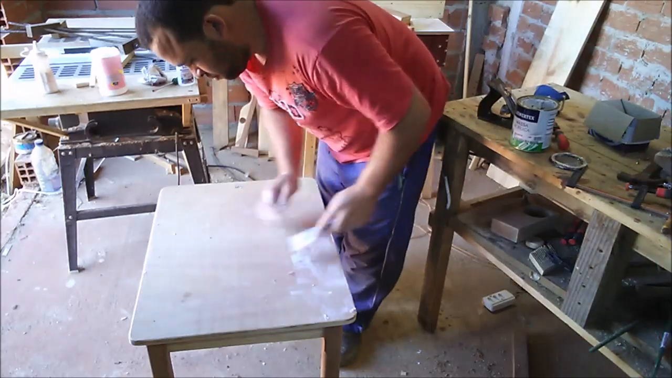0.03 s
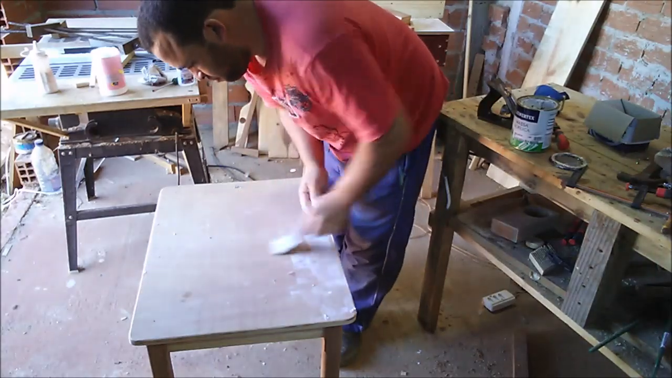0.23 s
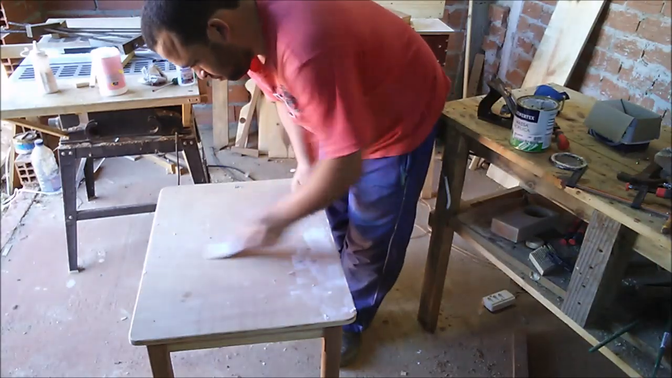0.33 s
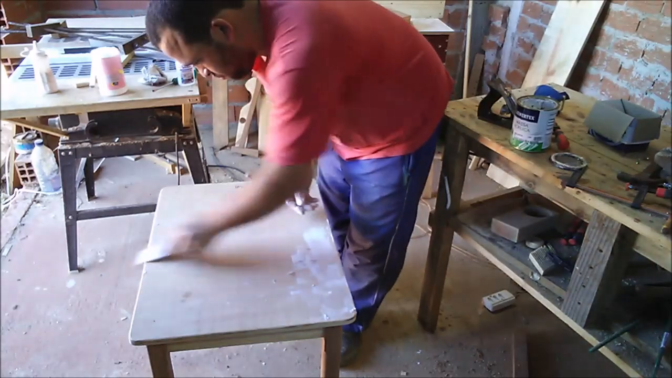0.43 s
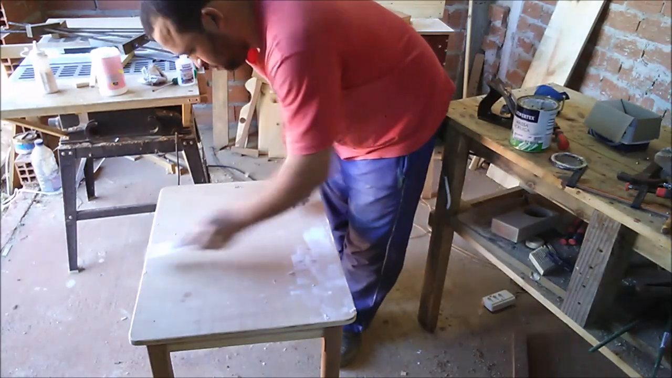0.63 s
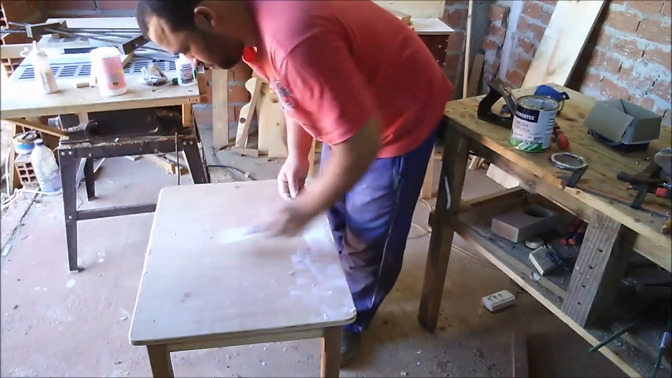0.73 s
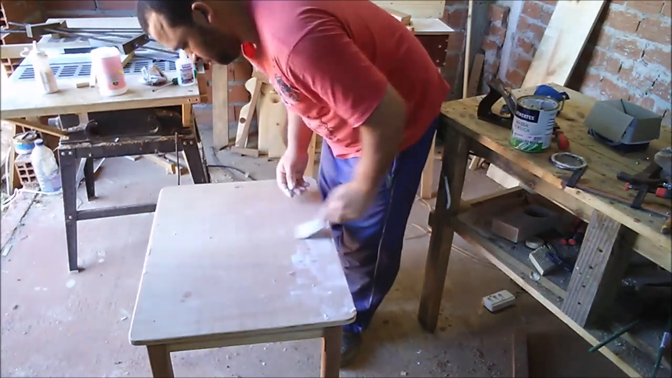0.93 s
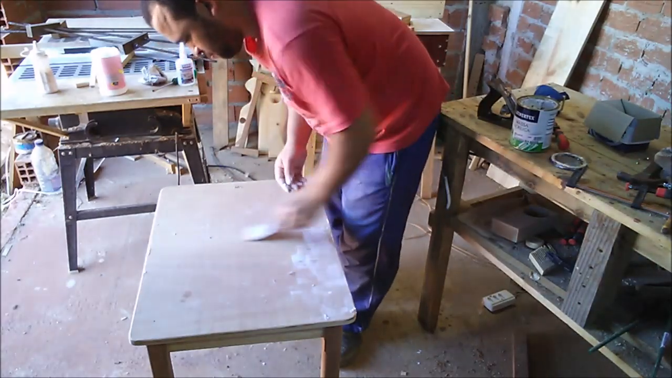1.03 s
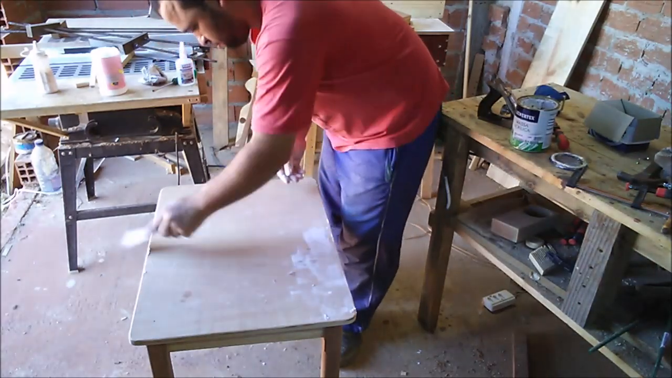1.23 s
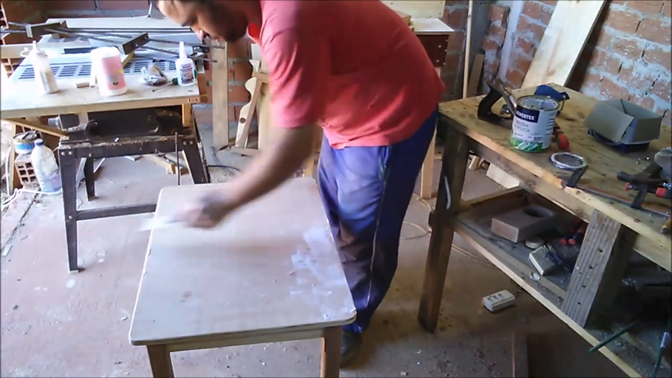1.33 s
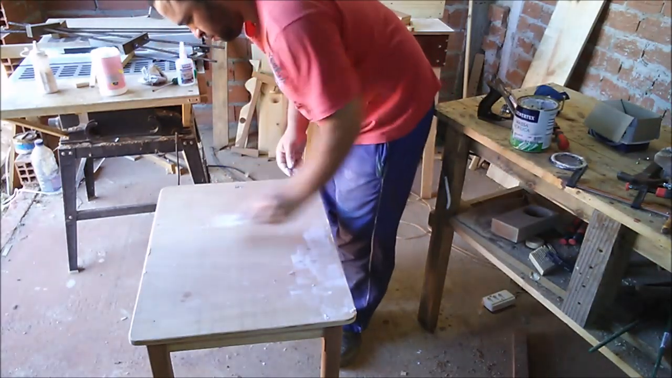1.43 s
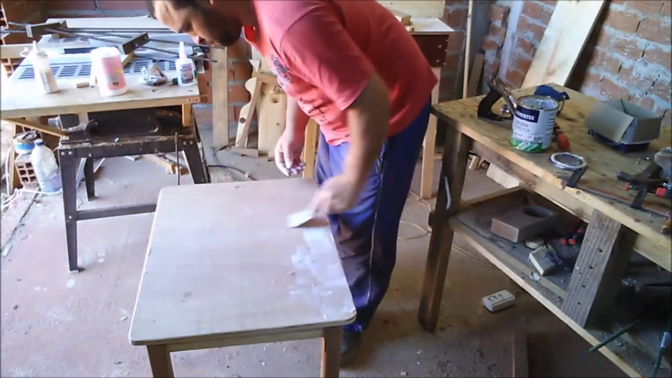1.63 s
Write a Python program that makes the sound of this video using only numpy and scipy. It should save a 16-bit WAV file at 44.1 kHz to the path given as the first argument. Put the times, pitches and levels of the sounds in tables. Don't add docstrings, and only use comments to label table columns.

```python
import sys
import numpy as np
from scipy import signal
from scipy.fft import rfft, irfft, next_fast_len
from scipy.io import wavfile
from scipy.ndimage import uniform_filter1d, map_coordinates

SR = 44100
rng = np.random.default_rng(int(sys.argv[2]) if len(sys.argv) > 2 else 0)


def unload_wav(signal):
    wavfile.write(
        sys.argv[1],
        SR,
        np.round(np.clip(np.atleast_2d(signal).T, -1, 1) * 32767).astype(np.int16),
    )


def ratio_of_db(decibels):
    return 10 ** (np.asarray(decibels, float) / 20)


N = 74970
LEAD_S = .5
M = N + round(LEAD_S * SR)

# pitch_hz, density_db_per_hz
AIR_COLOUR = [(100, -16.5), (380, -2.5), (680, -4.5), (850, -21.5), (3200, -25.5), (4500, -17.5),
              (8000, -34), (15500, -69)]
AIR_DB = -65

# start_s, length_s, first_hz, last_hz, level_db
FAR_TONES = [(-.02, 0.074, 555, 560, -53.5), (0.055, 0.086, 597, 545, -55.5),
             (.158, 0.027, 4130, 4260, -63), (.182, .04, 4380, 4480, -65), (.68, 0.11, 1060, 1060, -60.5),
             (0.804, 0.096, 6090, 6060, -73.5), (.888, .045, 4010, 4010, -70), (.9, .1, 535, 540, -52),
             (.935, 0.035, 1140, 1130, -54.5), (1.45, 0.16, 820, 745, -62.5),
             (1.494, 0.098, 4300, 4200, -65.5), (1.8, 0.113, 3800, 4700, -62),
             (1.58, 0.059, 6500, 6500, -78.5), (.54, 0.063, 780, 700, -54), (1.676, 0.046, 486, 450, -54.5),
             (1.672, 0.03, 1120, 1170, -54.5), (1.678, 0.024, 2620, 2600, -58),
             (2.3, 0.0353, 2050, 2000, -59.5), (1.676, .03, 3200, 2700, -64), (.85, .04, 5700, 5090, -73.5),
             (.885, 0.045, 1080, 1080, -67), (.135, .025, 1900, 1700, -69)]
FAR_WIDTH_HZ, FLUTTER_DB = 14, 2.5

# pitch_hz, t60_s
ROOM_DECAY = [(200, 0.4), (800, 0.93), (3000, 0.82), (6000, 0.62), (9000, 0.49), (13000, 0.42)]
# pitch_hz, level_db
WALL_COLOUR = [(200, 4), (700, 2), (1500, 2.5), (2500, 0), (4000, 3), (5000, -2), (7000, 1), (14000, -5.5)]
ROOM_DB, NEAR_DB, NEAR_SHARE = -13, -3.5, 0.52

# time_s, level_db
STROKE_PRESSURE = [
    [(-.4, -43), (-.3, -21.5), (-.15, -32), (-.14, -45)],
    [(.219, -41), (.223, -39.5), (.236, -32), (.27, -29), (.31, -29.5), (.4, -28), (.472, -30),
     (.49, -28.5), (.52, -60)],
    [(.955, -75), (.975, -54), (.985, -42), (.995, -35.5), (1.04, -37.5), (1.12, -29), (1.23, -29.5),
     (1.28, -33), (1.31, -42)],
    [(1.68, -71), (1.69, -52.5), (1.696, -59), (1.7, -40.5)],
]
# start_s, speeding_up_s, full_speed_pitch_hz, ridge_clarity (0-1)
HAND_PUSHES = [
    (-.45, 0.26, 4700, 0.89),
    (.224, .1, 4850, 1),
    (1.01, .1, 4950, .6),
    (1.7, .09, 4800, 1),
]
# pitch_hz, density_db_per_hz
SLOW_PAPER = [(88, -45.5), (200, -15), (844, -7), (1450, -9.5), (2310, -10), (5440, -9.5), (12000, -41.5),
              (15500, -39)]
# pitch_hz, density_db_per_hz
FAST_PAPER = [(88, -64), (200, -33.5), (607, -23.5), (1480, -10.5), (3000, -7), (5300, -2.5), (12000, -27),
              (15500, -34.5)]
# pitch_hz, width_hz, level_db
TABLE_TOP = [(264, 60, 4), (476, 25, 4.5), (594, 41, 6.5), (843, 9.3, 10.5), (1004, 59, 6),
             (1121, 13.6, 8.5), (1452, 60, 3.5), (2246, 51, 3.5), (2650, 180, 1.5), (3425, 120, 3),
             (4430, 50, 2.5), (5600, 150, 1)]
REST_HZ, SECOND, SECOND_DB = 933, 0.556, 7.5
GRIT_WIDTH, GRIT_DB = .065, 11
BLUR = .33
GRAINS_PER_S, GRAIN_DB, CLUMP_DB = 16000, 1.6, 1.21

# start_s, thump_db, edge_ring_db
PAD_KNOCKS = [
    (0.228, -34, -31),
    (0.488, -49, -28.5),
    (.99, -38.5, -47),
    (1.272, -50, -30.5),
]
# pitch_hz, level_db, t60_s
THUMP_MODES = [(249.5, 0, 0.077), (323.6, -0.5, 0.078), (489, -4.5, 0.093)]
# pitch_hz, level_db, t60_s
EDGE_MODES = [(607.5, -7, 0.17), (648, -10, .2), (989, -2, 0.047), (2293, -1, 0.059), (2520, 7, 0.048)]

# start_s, length_s, level_db, pitch_hz, width_hz
PAD_RETURNS = [
    (.61, .17, -60.5, 4500, 2990),
    (1.374, 0.19, -62.5, 4150, 1390),
]

# start_s, end_s, level_db, growth_db
PAPER_GRAZES = [
    (0.935, .985, -52, 6.5),
]
# pitch_hz, width_hz, level_db
LOOSE_SHEET = [(1134, 270, 0), (2040, 87, -10), (2710, 240, -5), (3290, 210, -3.5), (3920, 200, -2.5),
               (4810, 500, -2), (6010, 300, -4), (7200, 140, -10), (9070, 240, -24), (10420, 250, -23),
               (12200, 230, -26), (13800, 300, -27)]

# pitch_hz, density_db_per_hz
GATE_COLOUR = [(600, -37.5), (900, -0.5), (2000, 0.5), (4000, -0.5), (7000, -13), (10000, -29.5),
               (15500, -41.5)]
GATE_DB, GATE_FLOOR_DB = -60, -15
GATE_FRAMES, GATE_BINS = 14, 3
LOW_CUT_HZ = 216
HISS_DB, RUMBLE_DB, RUMBLE_HZ = -88, -95, 90


def unit(x):
    return x / np.sqrt(np.mean(np.abs(x) ** 2) + 1e-20)


def along(points, hz):
    f, v = np.transpose(points)
    return np.interp(np.log(hz + 1), np.log(f + 1), v)


def wobble(rate):
    knots = rng.standard_normal(int(M * rate / SR) + 4)
    return map_coordinates(knots, [np.arange(M) * rate / SR])


def filtered(x, response):
    m = next_fast_len(len(x) + 8192)
    return irfft(rfft(x, m) * response(np.fft.rfftfreq(m, 1 / SR)), m)[:len(x)]


def band(f, centre_hz, width_hz):
    damping = 1j * f * width_hz
    return damping / (centre_hz ** 2 - f * f + damping)


def air():
    murmur = filtered(rng.standard_normal(M), lambda hz: ratio_of_db(along(AIR_COLOUR, hz)))
    return ratio_of_db(AIR_DB) * unit(murmur)


def far_tones():
    now, out = np.arange(M) / SR - LEAD_S, np.zeros(M)
    for start, length, first_hz, last_hz, db in FAR_TONES:
        part = np.clip((now - start) / length, 0, 1)
        pitch = first_hz + (last_hz - first_hz) * part + FAR_WIDTH_HZ * wobble(60)
        level = ratio_of_db(db + FLUTTER_DB * wobble(44.98))
        swell = np.abs(np.sin(np.pi * part)) ** .5
        out += level * swell * np.sin(2 * np.pi * np.cumsum(pitch) / SR)
    return out


def room(x):
    hz, t, z = signal.stft(rng.standard_normal((2, SR)), SR, nperseg=256)
    t60 = along(ROOM_DECAY, hz)[:, None] * np.array([1, NEAR_SHARE])[:, None, None]
    far, near = signal.istft(z * ratio_of_db(-60 * t / t60), SR, nperseg=256)[1]
    tail = ratio_of_db(ROOM_DB) * far / np.linalg.norm(far)
    tail = tail + ratio_of_db(NEAR_DB) * near / np.linalg.norm(near)
    return signal.fftconvolve(x, np.pad(tail, (130, 0)))[:M]


def speed(t):
    start, rise, top_hz, clear = np.transpose(HAND_PUSHES)
    k = np.clip(np.searchsorted(start, t + .08) - 1, 0, None)
    return np.tanh(np.clip(t - start[k], 0, None) / rise[k]), top_hz[k], clear[k]


def scratch():
    hit, size, sign = rng.random((3, M))
    grain = ratio_of_db(-GRAIN_DB * np.log(size + 0.014)) * np.sign(sign - .5)
    grit = (hit < GRAINS_PER_S / SR) * grain
    grit = grit * ratio_of_db(CLUMP_DB * (wobble(41.17) + wobble(160)))

    hz, t, z = signal.stft(grit, SR, nperseg=256, noverlap=192)
    share, top_hz, clear = speed(t - LEAD_S)
    pitch = REST_HZ + (top_hz - REST_HZ) * share

    def ridge(centre):
        return np.exp(-.5 * (np.log((hz[:, None] + 1) / centre) / GRIT_WIDTH) ** 2)

    slow, fast = along(SLOW_PAPER, hz)[:, None], along(FAST_PAPER, hz)[:, None]
    broad = ratio_of_db(slow * (1 - share) + fast * share)
    ridges_db = GRIT_DB * ridge(pitch) + SECOND_DB * ridge(SECOND * pitch)
    beamed = broad * ratio_of_db(clear * (1 - BLUR * share ** 4) * ridges_db)
    colours = np.array([beamed, broad]) / np.sqrt(np.mean(beamed ** 2, axis=0))
    rubs = signal.istft(z * colours, SR, nperseg=256, noverlap=192)[1][:, :M] / np.std(grit)

    now = np.arange(M) / SR - LEAD_S
    press = sum(ratio_of_db(np.interp(now, *np.transpose(rows), left=-200, right=-200))
                for rows in STROKE_PRESSURE)

    def wood(f):
        return 1 + sum((ratio_of_db(db) - 1) * band(f, c, w) for c, w, db in TABLE_TOP)

    return [filtered(rub * press, wood) for rub in rubs]


def knocks():
    out, t = np.zeros(M + SR), np.arange(SR // 2) / SR

    def ring(modes):
        return sum(ratio_of_db(db + rng.normal(0, 0.67) - 60 * t / t60) * np.sin(2 * np.pi * hz * t)
                   for hz, db, t60 in modes)

    for start, thump_db, edge_db in PAD_KNOCKS:
        blow = ratio_of_db(thump_db) * ring(THUMP_MODES) + ratio_of_db(edge_db) * ring(EDGE_MODES)
        blow = blow * (1 - np.exp(-t / 0.0036))
        out[round((start + LEAD_S) * SR):][:len(t)] += blow
    return out[:M]


def swish():
    now, out = np.arange(M) / SR - LEAD_S, np.zeros(M)
    for start, length, db, hz, width_hz in PAD_RETURNS:
        breeze = unit(filtered(rng.standard_normal(M), lambda f: band(f, hz, width_hz) ** 3))
        swell = np.abs(np.sin(np.pi * np.clip((now - start) / length, 0, 1)))
        out += ratio_of_db(db) * swell * breeze
    return out


def grazes():
    now, level = np.arange(M) / SR - LEAD_S, np.zeros(M)

    def paper(f):
        return sum(ratio_of_db(db) * np.abs(band(f, c, w)) ** 1.5 for c, w, db in LOOSE_SHEET)

    sheet = unit(filtered(rng.standard_normal(M), paper))
    for start, end, db, growth_db in PAPER_GRAZES:
        growth = ratio_of_db(db + growth_db * (now - start) / (end - start))
        level += growth * np.clip((now - start) / .003, 0, 1) * (now < end + .01)
    return sheet * level


def scene():
    near, broad = scratch()
    blows = knocks()
    walls = room(filtered(broad + .5 * blows, lambda hz: ratio_of_db(along(WALL_COLOUR, hz))))
    mono = near + blows + grazes() + swish() + walls + air() + far_tones()
    mono = mono[M - N:]
    return np.array([mono, mono])


def low_cut(x):
    return filtered(x, lambda hz: (hz ** 2 / (hz ** 2 - LOW_CUT_HZ ** 2 - 1.4j * hz * LOW_CUT_HZ)) ** 2)


def suppress(x):
    hz, _, z = signal.stft(x, SR, nperseg=512, noverlap=384)
    shape = ratio_of_db(along(GATE_COLOUR, hz)) ** 2
    threshold = ratio_of_db(2 * GATE_DB) * shape / shape.sum() / 2
    power = uniform_filter1d(np.abs(z) ** 2, GATE_FRAMES, axis=1, origin=GATE_FRAMES // 2 - 1)
    power = uniform_filter1d(power, GATE_BINS, axis=0)
    gain = np.clip(1 - threshold[:, None] / (np.abs(power) + 1e-20), ratio_of_db(GATE_FLOOR_DB), 1)
    return signal.istft(z * gain, SR, nperseg=512, noverlap=384)[1][:N]


def self_noise():
    rumble = unit(filtered(rng.standard_normal(N), lambda hz: band(hz, RUMBLE_HZ, RUMBLE_HZ)))
    return ratio_of_db(HISS_DB) * rng.standard_normal(N) + ratio_of_db(RUMBLE_DB) * rumble


def top_cut(x):
    return signal.sosfilt(signal.butter(12, 15950, fs=SR, output="sos"), x)


def record(dry):
    x = suppress(low_cut(dry[0]))
    x = x + self_noise()
    return top_cut(np.array([x, x]))


dry = scene()
out = record(dry)
unload_wav(out)
```